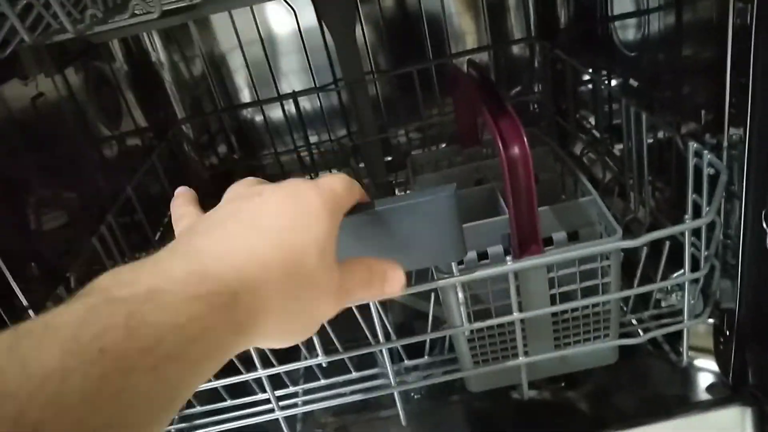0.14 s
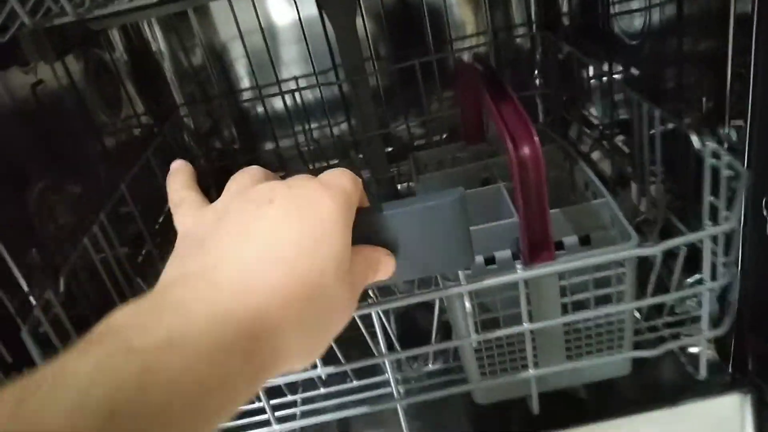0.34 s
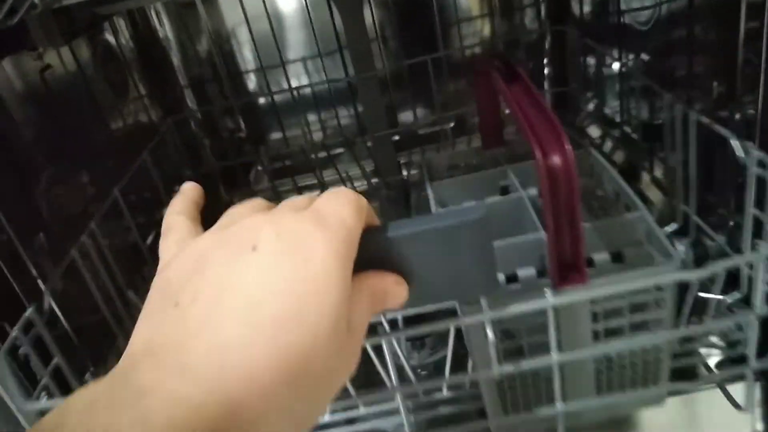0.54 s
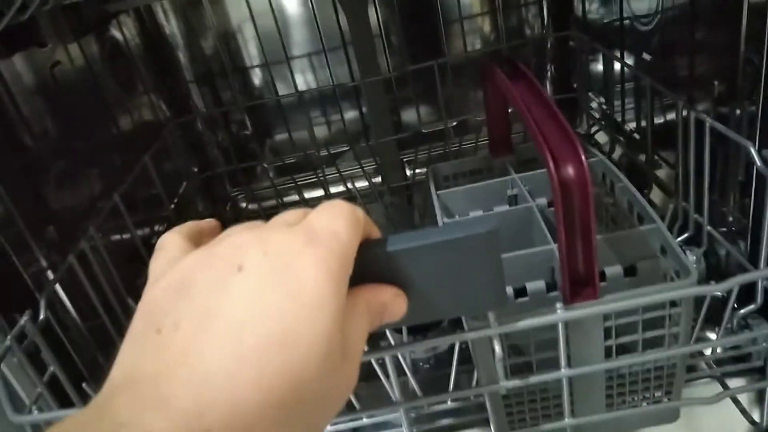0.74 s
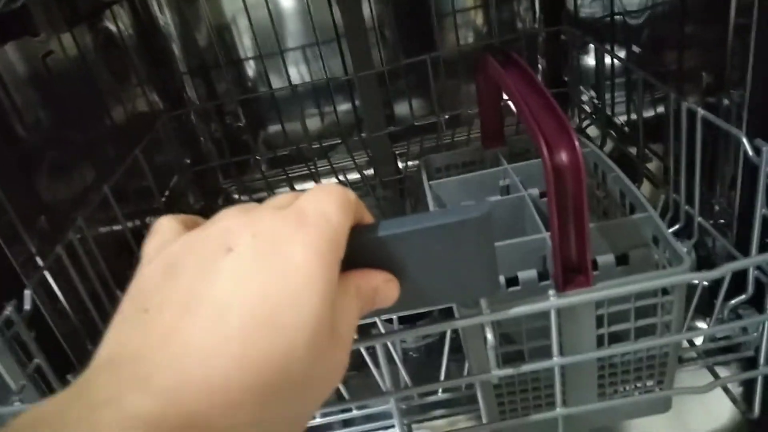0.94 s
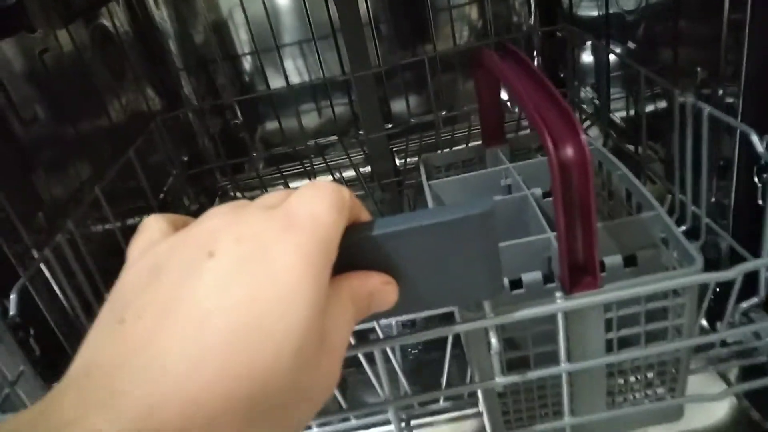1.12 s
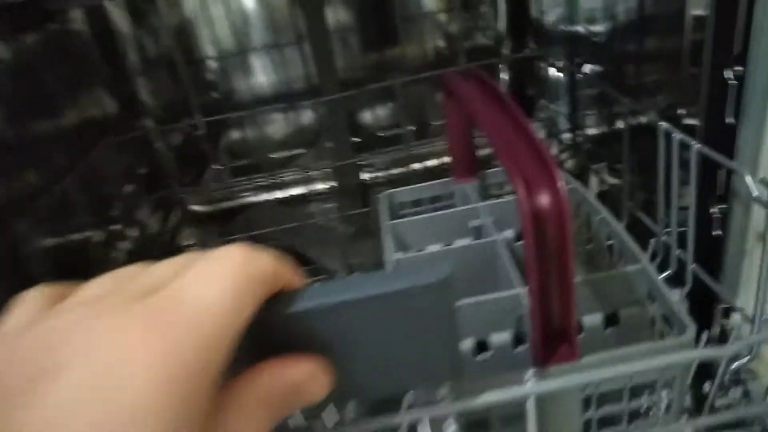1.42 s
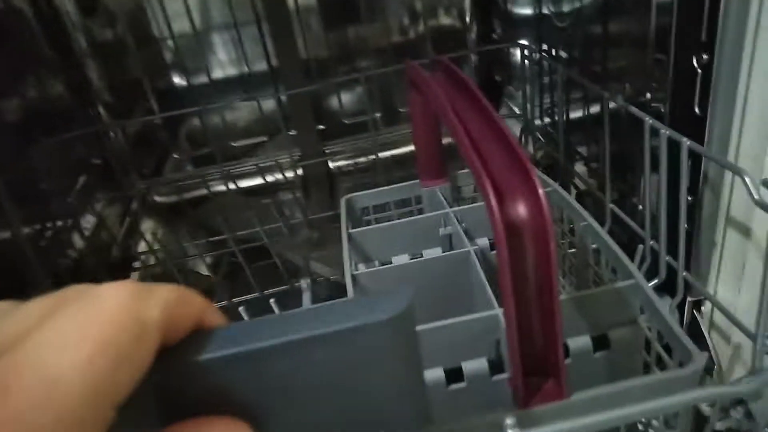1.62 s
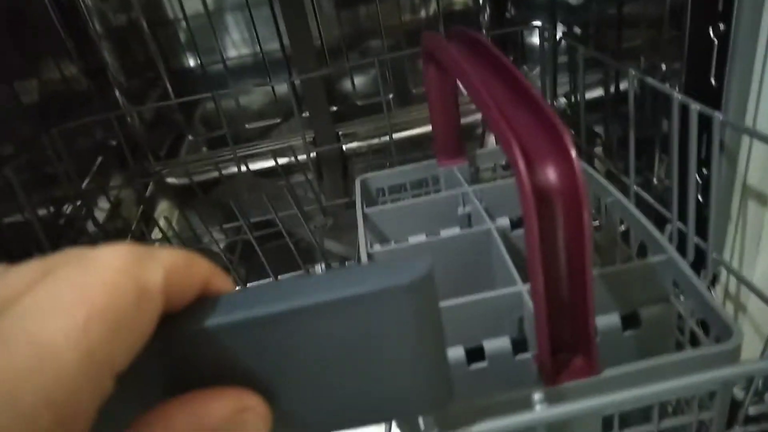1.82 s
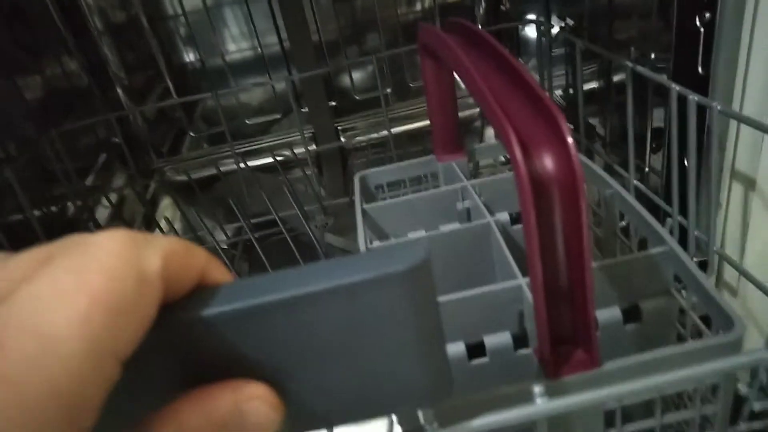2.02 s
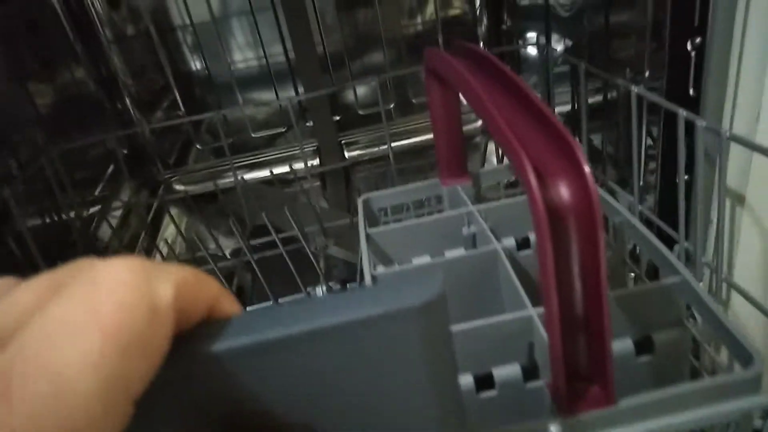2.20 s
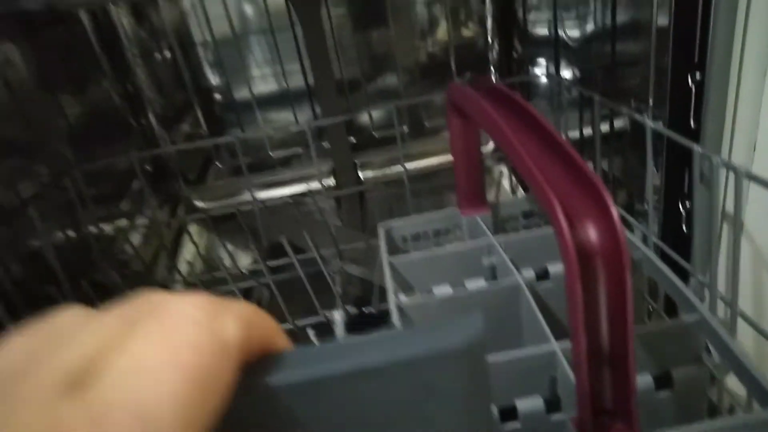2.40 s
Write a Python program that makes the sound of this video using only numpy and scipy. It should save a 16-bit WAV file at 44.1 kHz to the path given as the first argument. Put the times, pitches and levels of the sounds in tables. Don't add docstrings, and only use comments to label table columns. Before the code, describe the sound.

Dull plastic knocks and wire rattle as a dishwasher's lower rack is tugged and rolled out

```python
import sys
import numpy as np
from scipy import signal
from scipy.fft import rfft, irfft, next_fast_len
from scipy.io import wavfile
from scipy.ndimage import uniform_filter1d, map_coordinates

SR = 44100
rng = np.random.default_rng(int(sys.argv[2]) if len(sys.argv) > 2 else 0)


def master(y):
    cut = np.clip(np.atleast_2d(y).T, -1, 1)
    pcm = np.round(cut * 32767)
    wavfile.write(sys.argv[1], SR, pcm.astype(np.int16))


def natural_amplitude(level_db):
    exponent = np.asarray(level_db, float) / 20
    return 10 ** exponent


N = 112454
T = np.arange(N) / SR
SHORT, FRAME = SR // 5, 512
RISE_S = 0.00084

# (frequency [Hz], width [Hz], level [dB])
TUB_MODES = [(78.7, 16.7, 0.5), (171, 57.3, -3.5), (242.2, 60, -6), (356, 27.3, -0.5), (480, 80, -9.5),
             (670, 81, -14)]
# (frequency [Hz], width [Hz], level [dB])
BASKET_MODES = [(265, 52, -4.5), (371, 42.4, -1.5), (468.3, 58, -5.5), (575, 30.4, -6), (664.4, 38, -9.5),
                (785, 35, -8), (882, 76, -13), (1095, 125, -12.5), (1390, 120, -15.5), (1546, 73, -15),
                (1815, 210, -16), (2354, 230, -18), (2687, 90, -15), (2850, 220, -25.5)]
# (frequency [Hz], level [dB])
WIRE_SPECTRUM = [(1760, -34), (3000, -1), (4570, -6), (5070, -4.5), (6760, -6), (8110, -11.5),
                 (14500, -20.5), (16000, -29.5)]
# (time [s], frequency [Hz])
SQUEAK_PITCH = [
    (.85, 4000),
    (.93, 4070),
    (1.05, 4400),
    (1.13, 4500),
    (1.3, 4350),
    (1.55, 4050),
    (1.8, 4300),
]
# (from [s], to [s])
GATE_OPEN = [(.135, .146), (.149, .154), (.168, .172), (.175, .183), (.199, 1.136), (1.148, 1.167),
             (1.175, 1.18), (1.187, 1.191), (1.213, 1.217), (1.222, 1.234), (1.243, 1.25), (1.26, 1.264),
             (1.277, 1.285), (1.311, 1.77), (1.993, 2.438), (2.467, 2.473)]


def unit(x):
    return x / np.sqrt(np.mean(x ** 2) + 1e-20)


def peak(x):
    return x / np.abs(x).max()


def along(points, hz):
    f, v = np.transpose(points)
    return np.interp(np.log(hz + 1), np.log(f + 1), v)


def curve(rows):
    return np.interp(T, *np.transpose(rows))


def wobble(rate):
    return map_coordinates(rng.standard_normal(FRAME), [T * rate])


def filtered(x, response):
    m = next_fast_len(N + SR // 2)
    return irfft(rfft(x, m) * response(np.fft.rfftfreq(m, 1 / SR)), m)[..., :N]


def resonant(modes):
    def response(f):
        total = 0
        for k, (c, w, db) in enumerate(modes):
            damping = 1j * f * w
            total = total + (-1) ** k * natural_amplitude(db) * damping / (c * c - f * f + damping)
        return total
    return response


def bumps(rate, spread_db):
    struck = rng.random(N) < rate / SR
    return unit(struck * rng.standard_normal(N) * natural_amplitude(spread_db * rng.exponential(size=N)))


def patches(shape, bins, frames):
    x = uniform_filter1d(rng.standard_normal(shape), size=bins, axis=0)
    return unit(uniform_filter1d(x, size=frames, axis=1))


def streaky(spectrum, streak_db, patchy_db):
    z = signal.stft(rng.standard_normal(N + FRAME), nperseg=FRAME)[2]
    uneven_db = streak_db * patches(z.shape, 3, 40) + patchy_db * patches(z.shape, 8, 6)
    x = signal.istft(z * natural_amplitude(uneven_db), nperseg=FRAME)[1][:N]
    return unit(filtered(x, lambda hz: natural_amplitude(along(spectrum, hz))))


def phone_noise():
    # (frequency [Hz], rms level [dB])
    whine_tones = [
        (10000, -79),
        (12500, -82.5),
    ]
    tones = sum(natural_amplitude(db + 3) * np.sin(2 * np.pi * hz * T) for hz, db in whine_tones)
    return tones * np.clip((T - 1.66) / .1, .15, 1) + natural_amplitude(-79.5) * rng.standard_normal(N)


def kitchen_murmur():
    return natural_amplitude(-59) * unit(filtered(rng.standard_normal(N), lambda hz: 1 / (1 + (hz / 111) ** 2)))


def knocks():
    # (time [s], peak [dB], main pitch [Hz], brightness
    # [dB], chatter length [s])
    impacts = [(0.113, -38.5, 1040, -38, 0.009), (0.122, -30, 370, -43, 0.0079),
               (0.14, -35.5, 386, -45, 0.0045), (0.176, -36.5, 350, -49, 0.0033),
               (0.2, -19, 480, -81, 0.0071), (0.217, -28.5, 785, -35, 0.0024), (0.274, -31, 785, -33, 0.0069),
               (0.287, -25.5, 904, -32, 0.015), (0.379, -24, 1054, -28.5, 0.017),
               (0.394, -21.5, 575, -35, 0.0024), (0.405, -30.5, 371, -17.5, 0.01),
               (0.489, -12, 762, -25.5, 0.0033), (.497, -16.5, 563, -36, 0.014),
               (0.507, -25, 476, -41.5, 0.0029), (0.514, -21, 670, -35, 0.019), (0.529, -18, 1140, -26, 0.02),
               (0.555, -24.5, 650, -22, .016), (0.634, -29, 343, -21, 0.0088), (.67, -12, 726, -26.5, 0.0096),
               (.673, -14, 405, -36.5, .006), (0.683, -12.5, 1504, -18.5, 0.0036),
               (0.693, -17.5, 357, -21.5, 0.0081), (0.707, -25, 371, -26, .015), (.74, -26, 350, -33, 0.0105),
               (0.842, -31, 350, -28, 0.0088), (0.923, -31, 930, -27, 0.0085),
               (1.308, -32.5, 378, -48, 0.012), (1.375, -24, 480, -43, 0.0084),
             (1.398, -27.5, 371, -71, 0.0046), (1.475, -40.5, 1150, -29, 0.007),
             (1.531, -31, 371, -38, 0.0095), (1.575, -34.5, 1170, -21, 0.0068),
             (1.684, -37, 670, -34, 0.013), (1.991, -32.5, 575, -16.5, 0.015),
             (2.237, -25.5, 1700, -28, 0.015), (2.254, -24.5, 477, -43, 0.0225),
             (2.261, -27, 1100, -34, 0.0098), (2.273, -30, 1095, -11, 0.0039),
             (2.295, -31.5, 1390, -39, 0.0057)]
    nudges = [(a, -41, 400, -40, b - a) for a, b in GATE_OPEN[5:-3]]
    favour_db, scatter_db, rebound = 11.5, 2.5, 0.73
    out, t = np.zeros(N + SR), T[:SHORT]
    f = np.fft.rfftfreq(SHORT, 1 / SR)
    for s, db, hz, bright_db, length in impacts + nudges:
        touch, size, hiss = rng.random((3, SHORT))
        fade = np.exp(-t / np.clip(length, .002, .04))
        chatter = np.where(t == 0, 1, (touch < 700 / SR) * (2 * size - 1) * fade * rebound)
        top_hz = 2930 * natural_amplitude(0.38 * (db + 20.5) + 0.18 * (bright_db + 26))
        blows = rfft(chatter) / (1 - (f / top_hz) ** 2 + 1.3j * f / top_hz) ** 2
        modes = []
        for c, w, g in BASKET_MODES:
            favour = favour_db * np.exp(-(np.log(c / hz) / 0.34) ** 2)
            modes.append((c, w, g + favour + scatter_db * rng.standard_normal()))
        dull = peak(irfft(blows * resonant(modes)(f)))
        thud = peak(irfft(blows * resonant(TUB_MODES[:2])(f))) * natural_amplitude(-18 - 0.61 * abs(db + 15.5))
        fizz = peak(irfft(rfft(2 * hiss - 1) * natural_amplitude(along(WIRE_SPECTRUM, f))))
        fizz = fizz * fade * (1 - np.exp(-t / RISE_S))
        out[round(s * SR):][:SHORT] += natural_amplitude(db - 1.5) * (dull + thud + natural_amplitude(bright_db + 12) * fizz)
    return out[:N]


def tub_answer(x):
    # (frequency [Hz], t60 [s])
    decay = [(100, 0.62), (400, 0.066), (1500, 0.27), (12000, 0.043)]
    out = np.zeros(N + SR)
    for k in range(13):
        hz, t, z = signal.stft(rng.standard_normal(SR // 2), SR, nperseg=FRAME // 2)
        fading = z * natural_amplitude(-60 * t / along(decay, hz)[:, None])
        tail = signal.istft(fading, SR, nperseg=FRAME // 2)[1]
        wet = signal.fftconvolve(x[k * SHORT:][:SHORT], tail / np.linalg.norm(tail))
        out[k * SHORT:][:len(wet)] += wet
    return out[:N]


def rattle():
    # (time [s], force [dB])
    shaking = [(0, -90), (.1, -83), (.115, -47), (.2, -57), (.29, -35.5), (.45, -40.5), (.62, -40.5),
               (.74, -37.5), (.85, -50.5), (1.1, -50.5), (1.4, -55.5), (1.75, -63.5), (1.85, -83),
               (1.97, -76), (1.995, -52), (2.25, -48.5), (2.55, -52)]
    # (frequency [Hz], level [dB])
    plastic = [(150, -42.5), (300, -1.5), (1200, -2), (2400, -16.5), (3300, -26), (6000, -58.5)]
    # (time [s], level [dB])
    fizz_level = [
        (.19, -32),
        (.25, -38),
        (.29, -27.5),
        (.36, -23.5),
        (.41, -17.5),
        (.47, -20.5),
        (.55, -19),
        (.8, -19.5),
        (.9, -30),
    ]
    shake = filtered(bumps(2500, spread_db=0.5), resonant(BASKET_MODES))
    shake = unit(filtered(shake, lambda hz: natural_amplitude(along(plastic, hz))))
    fizz = streaky(WIRE_SPECTRUM, streak_db=3.5, patchy_db=2.0) * natural_amplitude(curve(fizz_level))
    return (shake + fizz) * natural_amplitude(curve(shaking) + 0.96 * wobble(33.0))


def wheel_boom():
    # (time [s], force [dB])
    rolling = [(0, -79), (.1, -85), (.13, -59), (.22, -47.5), (.665, -51), (.7, -36), (.82, -40),
               (1, -46.5), (1.15, -41.5), (1.3, -44.5), (1.45, -44.5), (1.62, -43), (1.76, -48),
               (1.85, -55), (1.97, -53.5), (2.0, -45.5), (2.55, -54)]
    boom = unit(filtered(bumps(1500, spread_db=2.0), resonant(TUB_MODES)))
    return boom * natural_amplitude(curve(rolling) + 1.5 * wobble(12.12) + 1.5 * wobble(43))


def wire_rings():
    # (time [s], peak [dB], pitch [Hz], t60 [s])
    touches = [(.257, -72, 6400, 0.053), (.278, -57, 5680, 0.032), (.289, -50, 6900, 0.028),
               (0.37, -43, 5760, 0.02), (.379, -48, 6680, .03), (.379, -32, 2192, .04),
               (.381, -41.5, 3250, .04), (.404, -43.5, 6700, 0.035), (.49, -39.5, 4370, 0.033),
               (0.532, -44, 7170, .03), (.538, -47.5, 5700, .05), (.552, -44.5, 6700, .06),
               (.556, -46, 4920, .035), (0.671, -37.5, 5220, .05), (.672, -42, 6100, .04),
               (.684, -39.5, 5690, .05), (.671, -25, 3140, .025), (.672, -28.5, 2000, .03),
               (0.686, -26.5, 2450, .03), (.706, -39.5, 2890, 0.028), (1.577, -46, 1898, 0.046),
               (1.576, -56, 2800, .05), (1.994, -44.5, 4310, 0.032), (1.994, -47, 5560, 0.025),
               (2.017, -49, 4360, 0.056), (2.016, -43.5, 5670, 0.044), (2.274, -48, 10150, .02),
               (2.469, -39, 1455, 0.023)]
    out, t = np.zeros(N + SR), T[:2 * SHORT]
    for s, db, hz, t60 in touches:
        ring = np.sin(2 * np.pi * hz * t) + 0.68 * np.sin(2 * np.pi * .94 * hz * t)
        out[round(s * SR):][:len(t)] += natural_amplitude(db - 60 * t / t60) * ring * (1 - np.exp(-t / RISE_S))
    return out[:N]


def panel_hums():
    # (time [s], peak [dB], pitch [Hz], t60 [s])
    panels = [(.334, -27.5, 379.7, 0.19), (.387, -29, 399, 0.088), (0.693, -30, 374.8, 0.15),
              (.7, -36.5, 80, 0.28), (.735, -26.5, 352, 0.11), (.755, -28.5, 373, 0.23),
              (.81, -33.5, 365.5, 0.12), (.88, -41.5, 361.8, 0.43), (1.531, -50, 368, 0.21),
              (1.578, -34.5, 345, 0.17), (1.683, -38.5, 702, 0.037), (1.69, -39, 362.2, 0.12),
              (1.812, -59, 1080, .1), (2.257, -27, 493, .14)]
    out, t = np.zeros(N + SR), T[:2 * SHORT]
    for s, db, hz, t60 in panels:
        rise = 1 - np.exp(-t / 0.0076)
        out[round(s * SR):][:len(t)] += natural_amplitude(db - 60 * t / t60) * np.sin(2 * np.pi * hz * t) * rise
    return out[:N]


def axle_rub():
    # (frequency [Hz], level [dB])
    axle_spectrum = [(880, -45), (1500, -6.5), (3000, -13), (6700, -7), (7690, -22), (11100, -4.5),
                     (16000, -17)]
    rub = streaky(axle_spectrum, streak_db=1.5, patchy_db=4.0)
    airy = filtered(rub, lambda hz: hz > 8000)
    delay_s = 4 / curve(SQUEAK_PITCH)
    echo = .7 * map_coordinates(rub - airy, [(T - delay_s) * SR])
    return rub + echo - airy * np.clip((T - 1.4) / 0.17, 0, .6)


def axle_squeak():
    # (pitch ratio, level [dB])
    fellows = [(1, -3), (1.19, -11), (.55, -11), (1.57, -11), (1.39, -14)]
    turn = 2 * np.pi * np.cumsum(curve(SQUEAK_PITCH)) / SR
    bands = np.zeros(N)
    for ratio, db in fellows:
        slow = filtered(rng.standard_normal(N), lambda hz: 1 / (1 + (hz / 90) ** 2))
        bands += natural_amplitude(db) * (1.1 + unit(slow)) * np.sin(ratio * turn)
    swell = np.clip((T - .9) / .06, 0, 1)
    return swell * natural_amplitude(-10 * (T > 1.15)) * bands


def axles():
    # (time [s], level [dB])
    pull = [
        (.65, -125),
        (.85, -65.5),
        (1, -70.5),
        (1.12, -59),
        (1.4, -59),
        (1.6, -59),
        (1.77, -65.5),
        (1.8, -83),
    ]
    return (axle_rub() + axle_squeak()) * natural_amplitude(curve(pull) + 0.4 * wobble(25))


def drone():
    # (time [s], decay by 20 dB [s], pitch [Hz], level [dB])
    low_tone = (1.375, .35, 160, -46)
    s, fall_s, hz, db = low_tone
    return (T > s) * natural_amplitude(db - 20 * np.abs(T - s) / fall_s) * np.sin(2 * np.pi * hz * T)


def track_scrape():
    # (frequency [Hz], level [dB])
    track_spectrum = [(530, -42.5), (900, -25.5), (1390, -2), (3430, -12.5), (5040, -9.5), (6110, -24.5),
                      (6720, -16.5), (7680, -27), (16000, -34.5)]
    # (time [s], level [dB])
    scraping = [
        (1.98, -83),
        (1.99, -55.5),
        (2.25, -49),
        (2.4, -53),
        (2.55, -57),
    ]
    noise = streaky(track_spectrum, streak_db=2.5, patchy_db=.8)
    return noise * natural_amplitude(curve(scraping) + 0.83 * wobble(25))


def scene():
    hits = knocks() + wire_rings() + panel_hums()
    wheels = wheel_boom() + axles() + drone() + track_scrape()
    return (kitchen_murmur() + hits + natural_amplitude(-7.5) * tub_answer(hits) + rattle() + wheels)[None]


def noise_gate(x):
    ramp_s, opened = .003, np.zeros(N)
    for a, b in GATE_OPEN:
        opening = np.clip((T - a) / ramp_s + .5, 0, 1)
        closing = np.clip((b - T) / ramp_s + .5, 0, 1)
        opened += opening * closing
    return x * natural_amplitude(-12 * (1 - np.clip(opened, 0, 1)))


def low_pass(x):
    return signal.sosfilt(signal.butter(12, 16470, fs=SR, output="sos"), x)


def record(dry):
    gated = noise_gate(dry + phone_noise())
    mix = filtered(gated, lambda hz: (hz < 15950) * 1j * hz / (60 + 1j * hz))
    return low_pass(mix)


dry = scene()
out = record(dry)
master(out)
```